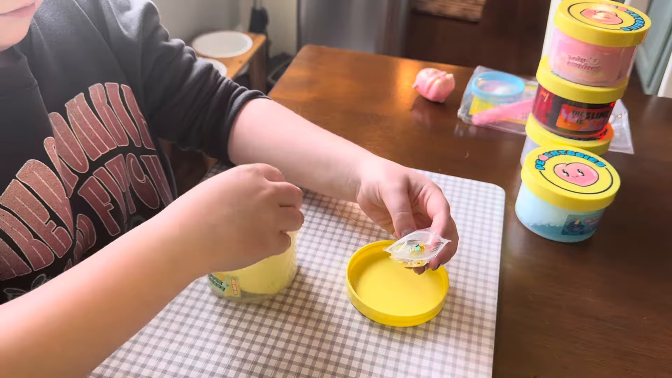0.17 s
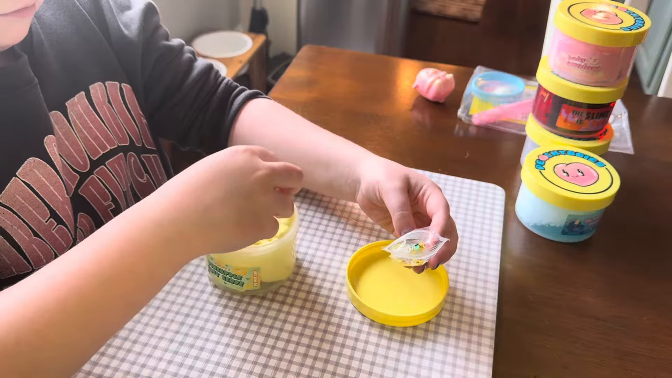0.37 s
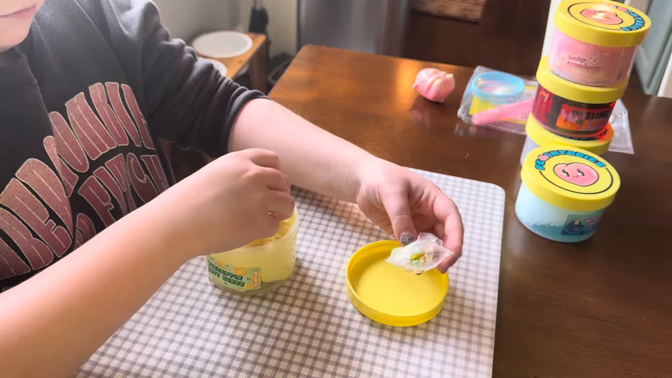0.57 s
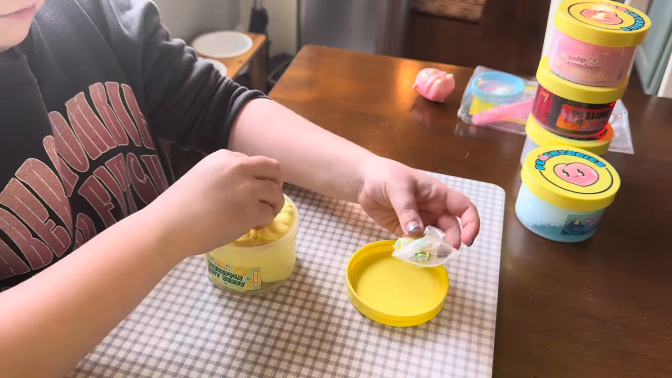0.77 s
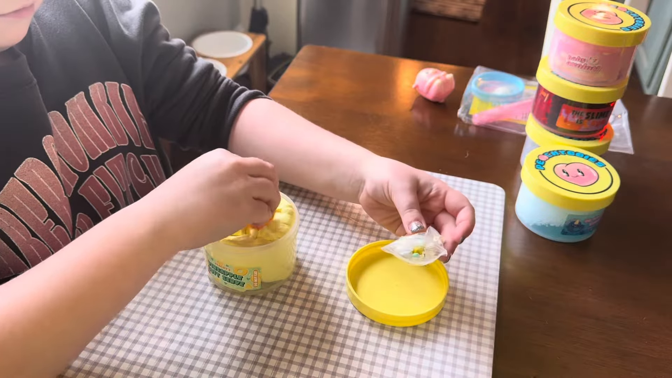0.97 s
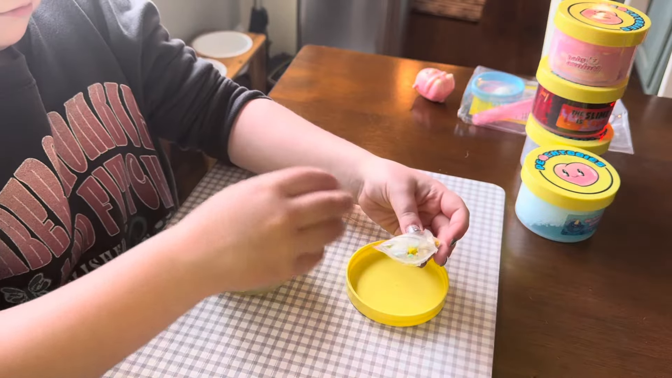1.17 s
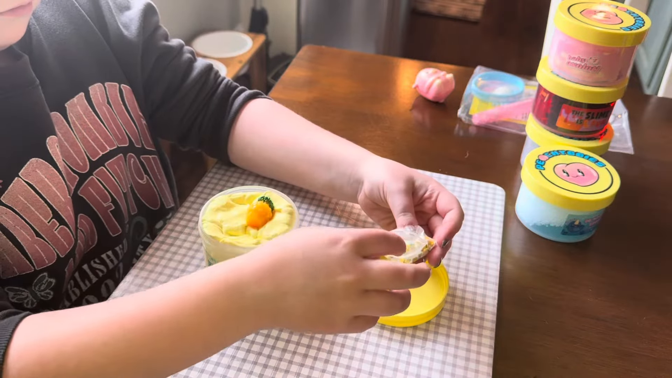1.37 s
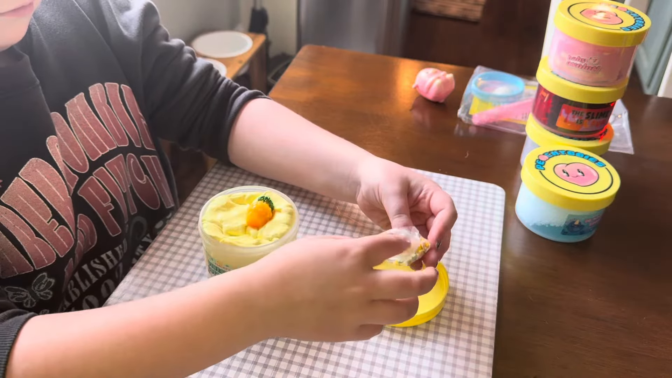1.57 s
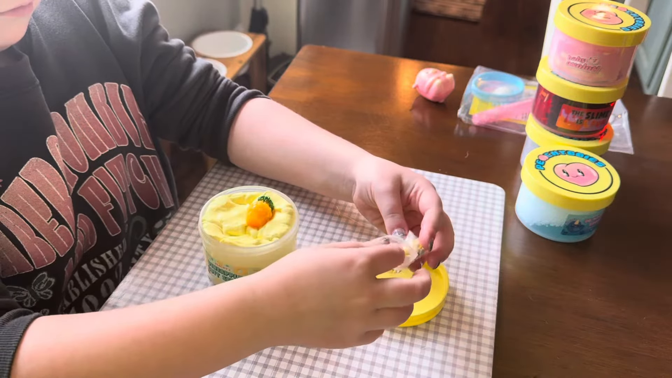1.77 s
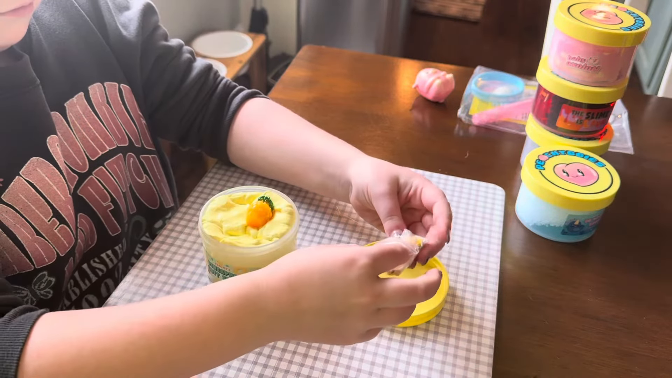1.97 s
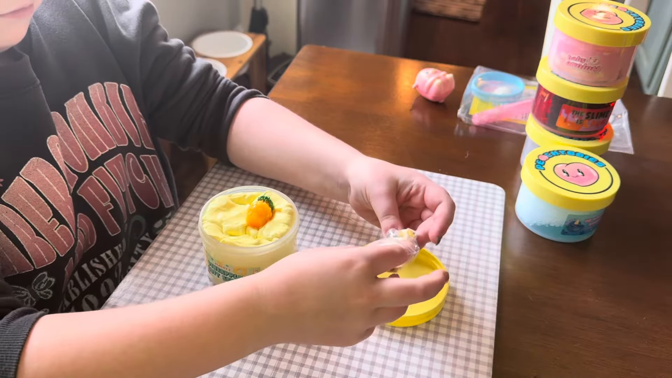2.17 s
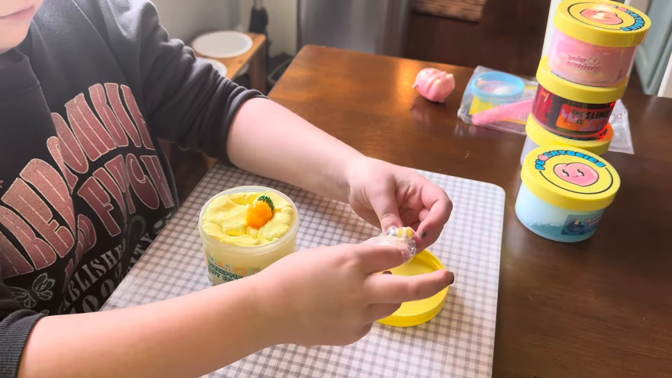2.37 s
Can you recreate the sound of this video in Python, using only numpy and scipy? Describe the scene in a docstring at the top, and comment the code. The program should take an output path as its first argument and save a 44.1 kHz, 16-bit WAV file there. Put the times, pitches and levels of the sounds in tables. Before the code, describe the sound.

Close stereo pickup of thin plastic film being handled: one early snap, a light knock bouncing to rest on wood, soft low bumps, then increasingly busy crisp crackling over faint room hum.

```python
"""Fingers work a small plastic bag on a wooden table: short noisy snaps over a fine crinkle of random ticks.
Early on a light hard thing drops and bounces to rest, each landing a noisy crack plus fading wood tones.
Arms and a tub thump the table softly: slowly swelling low tones with a scuff of noise.
Behind it a quiet room hums, made of shaped random noise. Two microphone ports, left and right, hear it all."""
import sys
import numpy as np
from scipy import signal
from scipy.fft import rfft, irfft
from scipy.io import wavfile
from scipy.ndimage import uniform_filter1d

SR = 44100
rng = np.random.default_rng(int(sys.argv[2]) if len(sys.argv) > 2 else 0)


def dump_mix(stems):
    """Bounce the given channels to the path in sys.argv[1] as a 16-bit WAV at rate SR."""
    frames = np.atleast_2d(stems).T  # one column per channel
    limited = np.clip(frames, -1, 1)  # hard clip at full scale
    pcm = np.round(limited * 32767).astype(np.int16)
    wavfile.write(sys.argv[1], SR, pcm)


N = 110250  # length [samples]

# Room hum, relative to its other pitches: (frequency [Hz], level [dB])
HUM_COLOUR = [(20, -4), (64, -1), (240, -1), (292, -2), (459, -6), (514, -9), (956, -18.5), (2710, -40.5),
              (3500, -36.5), (8000, -41), (11000, -42), (13500, -48), (15000, -53), (17000, -117)]
# How alike left and right are in the hum and the echo: (frequency [Hz], likeness [0 to 1])
LIKENESS = [(30, .99), (100, .96), (200, .88), (350, .7), (600, .3), (1200, .15), (4000, .3), (6500, .3),
            (7500, .93), (17000, .96)]
# Room echo: (frequency [Hz], time to fade by 60 dB [s], relative level [dB])
ROOM_ECHO = [(58.5, 0.57, -20), (149, 0.62, 10), (494, 0.34, 9.5), (1410, 0.63, 10.5), (2340, 0.62, 7),
             (5200, 0.55, 8), (9300, 0.33, 1), (12700, 0.37, 4.5), (15300, .2, -41)]

# Soft thumps: (time [s], peak of low tones [dB], upper tones relative to it [dB],
# scuff relative to it [dB], rise time of low tones [s])
THUMPS = [(0.225, -35, -6, -10, 0.086), (0.307, -30.5, -29, -30, 0.014), (0.427, -43.5, -11, -27, 0.0057),
          (0.458, -45.5, -12, -10, 0.022), (.68, -61, -27, -14, 0.022), (0.598, -58, -10, -38, 0.013),
          (0.8694, -59, 10.5, 13, 0.0019), (0.8864, -30.5, -9.5, -15, 0.01), (.93, -45, 2.5, -3.5, 0.0072),
          (0.976, -35, -7.5, -16, 0.0065), (1.076, -49.5, -10.5, -32, 0.012),
          (1.361, -45.5, -14, -19, 0.0089), (1.39, -46, -10, -21, .015), (1.43, -48.5, -9.5, -30.5, 0.013),
          (1.488, -48, -15, -23, 0.035), (1.545, -46.5, 1, -30, 0.0051), (2.016, -52.5, 7, 12.5, 0.002),
          (2.03, -43, 3.5, -10, 0.008), (2.044, -54.5, 12.5, -14, 0.002), (2.062, -52, 9.5, 3, 0.004),
          (2.087, -45, -11, -7.5, 0.015), (2.492, -52, 7, 11.5, 0.0026)]
# Table top tones, three low then the upper ones: (frequency [Hz], level [dB], time to fade by 60 dB [s])
TABLE_TONES = [(55.2, -5, 0.3), (64.35, 1, 0.22), (87.8, -12.5, 0.11), (161, -7.5, 0.076),
               (194.8, 7, 0.054), (240, -9.5, 0.12), (282.7, 2, 0.075), (498.5, -4, 0.049),
               (592, -14.5, 0.073), (761, -7, 0.042)]
# Colour of the scuff in a thump: (frequency [Hz], level [dB])
SCUFF_COLOUR = [(240, -4), (400, 4), (591, 8), (1100, -3.5), (2640, -0.5), (3220, -4.5), (5000, -9.5),
                (6200, -26.5), (9000, -29), (19800, -90)]

# Landings of the dropped thing, some on two edges: (time [s], crack peak [dB], lowest tone peak [dB],
# other tones peak [dB], crack tilt [dB per octave])
BOUNCES = [(0.2099, -15.5, -24, -20, 3), (0.2534, -18.5, -26, -25, -1.5), (0.2873, -27, -50, -31, 2),
           (0.2899, -21, -36, -26, 0), (0.3146, -37, -59, -41.5, 2), (0.3182, -20, -46, -33, -3),
           (0.341, -21, -42, -29.5, -1), (.3586, -27, -45, -45, -0.7)]
# Tones of the dropped thing and the wood, lowest first: (frequency [Hz], level [dB], time to fade by 60 dB [s])
KNOCK_TONES = [(132, -6, 0.15), (204.2, -2.5, 0.09), (230.8, -6.5, 0.079), (263.6, 0.5, 0.055),
               (345.6, -6.5, 0.084), (403.3, -7, 0.082), (613, -11.5, 0.045), (694, -9, 0.059),
               (972, -15, 0.16), (1270, -25.5, 0.27), (1506, -12, 0.035), (2113, -15, 0.053),
               (2596, -36, 0.0156)]
# Colour of the contact crack, before its tilt: (frequency [Hz], level [dB])
CRACK_COLOUR = [(150, -29), (350, -4.5), (600, 7.5), (1060, 2.5), (1780, -0.5), (2840, -3), (4300, -15.5),
                (5900, -15), (7700, -13), (12000, -26), (16500, -37)]

# Film snaps: (time [s], treble level before SNAP_DB [dB], body relative to it before BODY_DB [dB],
# body pitch [Hz], treble tilt before limiting [dB per octave])
SNAPS = [(0.454, -46.5, -19, 1350, -13), (0.6607, -63, -5, 990, 4), (0.7804, -59, -7, 1555, -5),
         (1.1025, -31.5, -15.5, 3550, -6.5), (1.4223, -55, -33, 1240, 1), (1.4463, -71, -7, 2070, 8),
         (1.5868, -35, -16, 2060, 11), (1.598, -43.5, -5.5, 1380, 0), (1.6145, -46, 3, 4100, 0),
         (1.6336, -37, -11, 3900, 0), (1.6354, -31.5, -12, 1100, -1), (1.7119, -54, 9.5, 3450, -14),
         (1.7423, -33, -10, 3400, 8), (1.7437, -52.5, 4.5, 1280, -4), (1.855, -51, -12, 990, -6),
         (1.869, -48, -31, 2620, -13), (1.8908, -45, -4, 2350, -10), (1.919, -48, -3, 1210, -12),
         (1.9234, -41, -2, 2860, -10), (1.9284, -59, 1, 2600, -10), (1.943, -33.5, -30, 3870, 5),
         (1.962, -27, -25, 830, 2), (1.9842, -28.5, -20, 830, 8), (2.0317, -27, -12.5, 1900, 9),
         (2.1229, -34, -9.5, 2920, 8.5), (2.165, -45, -17, 1570, 17), (2.1711, -53, 4, 2410, 16),
         (2.1951, -31, -40, 840, 9), (2.3345, -50.5, 3, 2330, -5.5), (2.3734, -45.5, 3, 2670, 8),
         (2.3786, -48, 10.5, 2600, -1), (2.3871, -57, 15, 2780, 10), (2.4, -59.5, 12.5, 1010, -8),
         (2.4362, -28, -14, 2840, 10), (2.476, -53, -3, 1740, 2), (1.937, -54, 8, 2800, 1),
         (1.994, -40.5, 3, 4240, -11), (2.39, -52, -1, 1900, -1), (2.413, -46, -12, 1480, 4),
         (0.158, -39.5, -26, 3520, 11), (1.5578, -41, 1, 4130, -6), (1.5614, -19.5, -15, 4100, 11),
         (1.5631, -36, -4.5, 1300, -11), (1.569, -26, -5.5, 3900, 0), (1.577, -54, -1, 4600, 2),
         (1.1067, -51.5, -1, 4520, 7), (1.9716, -41, -1, 3100, -8), (2.0446, -38, -22, 2580, 20)]
# Treble colour of a snap, before its tilt: (frequency [Hz], level [dB])
SNAP_TREBLE = [(1500, -106), (3000, -13), (5000, -1.5), (7800, 7.5), (10000, 2), (12000, 3), (14500, 2),
               (16500, -11)]
# Body colour of a snap: (multiple of its pitch [ratio], level [dB])
SNAP_BODY = [(.2, -40), (.5, -7), (1, 0), (1.6, -6), (3, -22), (6, -50)]
# Fine crinkle, average levels over time: (time [s], treble level [dB], body level [dB])
CRINKLE_LEVELS = [(0, -106, -129), (0.119, -85, -74.5), (0.149, -60, -65), (0.164, -55, -54.5),
                  (0.176, -64, -77.5), (0.218, -80, -52), (.4, -104, -65.5), (0.531, -67.5, -70),
                  (.67, -87, -72), (.9, -91, -77), (1.03, -87, -99), (1.18, -98, -79), (1.41, -80, -75),
                  (1.52, -70.5, -67.5), (1.59, -65, -56.5), (1.71, -67, -64), (1.82, -74, -68),
                  (1.872, -56.5, -61), (1.91, -64.5, -61.5), (1.982, -53.5, -54), (2.04, -79, -59),
                  (2.09, -68, -78), (2.18, -68, -70), (2.32, -75, -71.5), (2.39, -62, -70), (2.5, -84, -60)]
# Treble colour of the crinkle: (frequency [Hz], level [dB])
CRINKLE_TREBLE = [(3000, -14.5), (5000, -10), (7800, -0.5), (12000, -5), (14000, -1), (15000, -25),
                  (16500, -44)]
# Body colour of the crinkle: (frequency [Hz], level [dB])
CRINKLE_BODY = [(400, -15), (1200, -2), (2300, -4), (4000, 0), (7000, -12), (10000, -41), (16500, -53)]

# Phase difference of the ports: (frequency [Hz], lead of the left [radians])
PORT_PHASE = [(0, 0), (1000, .1), (2000, -.8), (4000, -2.4), (5500, -2), (7000, 0), (8000, .7), (9000, 2.2),
              (11000, 4.9), (13000, 7.1), (15000, 9.5), (17000, 11.9)]
# Level difference of the ports: (frequency [Hz], left over right [dB])
PORT_BALANCE = [(30, -.3), (125, -2), (500, .5), (2000, -1.5), (5000, -1), (7500, 0)]

HUM_DB, PATCH_DB = -59, 1.5  # average hum level, typical size of its drifting patches
TONE_HZ, TONE_WIDTH_HZ, TONE_DB = 516, 4.4, 9.5  # a faint narrow line in the hum
SCUFF_S, CRACK_S, SNAP_S, BODY_S = 0.02, 0.0015, 0.0008, 0.0013  # fading times of the noise puffs
RING_RISE_S = 0.0031  # rise time of the bounce tones
CRACK_EDGE, SNAP_EDGE = 4.26, 4  # strength of the single click beside the noise
CRACK_UNLIKE = 0.6  # strength of the crack noise that has opposite signs at the two ports
KNOCK_LEAD = 3  # head start of the bounces on the left, before their echo is added [samples]
SNAP_DB, BODY_DB = 5, 5  # boosts: for the whole snap, then for its body only
CRINKLE_PER_S, CRINKLE_SPREAD_DB = 3500, 2.7  # ticks per second on each side, scale of their random boost
THUMP_ROOM_DB, KNOCK_ROOM_DB, BAG_ROOM_DB = -1.5, -1, 3.5  # gains of the room echo
LOW_CUT_HZ, EDGE_HZ = 38, 16600  # lower and upper limits of the final sound


def amp(db):
    """Turns decibels into a gain."""
    return 10 ** (np.asarray(db) / 20)


def evened(x):
    """Scales a signal to an average (rms) level of 1."""
    return x / np.sqrt(np.mean(x ** 2) + 1e-20)


def read(points, hz, order=1):
    """Reads one column of a table at any frequency, along a log frequency axis."""
    columns = np.transpose(points)
    return np.interp(np.log(hz + 1), np.log(columns[0] + 1), columns[order])


def add(mix, s, sound):
    """Mixes a sound in at time s, cutting it off where the mix ends."""
    part = mix[..., round(s * SR):][..., :sound.shape[-1]]
    part += sound[..., :part.shape[-1]]


def colour(points, size=2048):
    """Makes a filter with the given colour that starts at once (minimum phase), with energy 1."""
    log_gain = np.log(amp(read(points, abs(np.fft.fftfreq(size, 1 / SR)))))
    taps = np.fft.ifft(np.exp(np.conj(signal.hilbert(log_gain)))).real[:size // 2]
    return taps / np.linalg.norm(taps)


def tilted_colour(points, tilt_db, pivot_hz):
    """Tilts a colour by some dB per octave around a pivot, then makes its filter."""
    return colour([(hz, db + tilt_db * np.log2(hz / pivot_hz)) for hz, db in points])


def burst(noise, decay_s, taps, edge=0):
    """A click plus a puff of noise that rises fast and dies away, both coloured; peak 1."""
    u = np.arange(len(noise)) / SR / decay_s
    puff = noise * np.minimum(4 * u, 1) * np.exp(-u)
    click = edge * signal.unit_impulse(len(u), 6)
    x = signal.fftconvolve(puff + click, taps)
    return x / abs(x).max()


def ring(tones, rise_s):
    """Fading tones that swell in after a push; peak 1."""
    t = np.arange(SR // 2) / SR
    x = sum(amp(db - 60 * t / t60) * np.sin(2 * np.pi * hz * t) for hz, db, t60 in tones)
    x = x * (1 - np.exp(-(t / rise_s) ** 2))
    return x / abs(x).max()


def pair(a, b, hz):
    """Blends two short-time spectra into a left-right pair, as alike as LIKENESS says."""
    same = np.clip(read(LIKENESS, hz), -1, 1)[:, None]
    return np.array([a, same * a + np.sqrt(1 - same ** 2) * b])


def room(x):
    """Room echo: sparse reflections of random sign, each pitch range dying at its own speed."""
    taps = np.zeros((2, SR))
    slots = np.arange(300, SR - 20, 20)
    at = slots + rng.integers(0, 20, (2, len(slots)))
    np.put_along_axis(taps, at, rng.choice([-1., 1.], at.shape), 1)
    hz, t, z = signal.stft(taps, SR, nperseg=512)
    fade_s = read(ROOM_ECHO, hz)[:, None]
    level_db = read(ROOM_ECHO, hz, order=2)[:, None] - 60 * t / fade_s
    tail = signal.istft(pair(*z, hz) * amp(level_db), SR, nperseg=512)[1]
    return signal.fftconvolve(x[None], tail / 25, axes=1)[:, :N]


def hum():
    """Room hum: random short-time spectra with gentle drifting patches and one narrow line."""
    frames, hz = N // 512 + 5, np.fft.rfftfreq(2048, 1 / SR)
    a, b, c, d, patches = rng.standard_normal((frames, 1025, 5)).T
    # smooth the patches over frequency, then over time
    patches = evened(uniform_filter1d(uniform_filter1d(patches, 12, 0), 6, 1))
    z = pair(a + 1j * b, c + 1j * d, hz)
    z = z * amp(read(HUM_COLOUR, hz)[:, None] + PATCH_DB * patches)
    z *= amp(TONE_DB / (1 + ((hz - TONE_HZ) / TONE_WIDTH_HZ) ** 2))[:, None]
    sound = signal.istft(z, nperseg=2048, noverlap=1536)[1][:, :N]
    return amp(HUM_DB) * evened(sound)


def thumps():
    """Soft pushes make the table top ring; its upper tones rise twice as fast, and noise adds a scuff."""
    out, scuff = np.zeros(N), colour(SCUFF_COLOUR)
    noises = rng.standard_normal((len(THUMPS), 3000))
    for (s, db, upper_db, scuff_db, rise_s), noise in zip(THUMPS, noises):
        add(out, s, amp(db) * ring(TABLE_TONES[:3], rise_s))
        add(out, s, amp(db + upper_db) * ring(TABLE_TONES[3:], 0.5 * rise_s))
        add(out, s, amp(db + scuff_db) * burst(noise, SCUFF_S, scuff))
    return out + amp(THUMP_ROOM_DB) * room(out)


def bounces():
    """Each landing is a contact crack and a woody ring that first pulls away (starts negative)."""
    out = np.zeros((2, N))
    boom, wood = ring(KNOCK_TONES[:1], RING_RISE_S), ring(KNOCK_TONES[1:], RING_RISE_S)
    noises = rng.standard_normal((len(BOUNCES), 2, 600))
    for (s, db, boom_db, ring_db, tilt_db), (shared, unlike) in zip(BOUNCES, noises):
        taps = tilted_colour(CRACK_COLOUR, tilt_db, 1000)
        crack = np.array([burst(shared + side * CRACK_UNLIKE * unlike, CRACK_S, taps, CRACK_EDGE)
                          for side in (1, -1)])
        add(out, s, amp(db) * crack)
        add(out, s, -amp(boom_db) * boom - amp(ring_db) * wood)
    direct = np.array([out[0], np.roll(out[1], KNOCK_LEAD)])
    return direct + amp(KNOCK_ROOM_DB) * room(out.mean(0))


def snaps():
    """Single snaps of the film: a sharp treble burst and a hollow body burst, with a room echo."""
    out, echo_source = np.zeros((2, N)), np.zeros(N)
    noises = rng.standard_normal((len(SNAPS), 2, 400))
    for (s, db, body_db, hz, tilt_db), (treble_noise, body_noise) in zip(SNAPS, noises):
        treble_db = db + SNAP_DB
        low_db = db + body_db + BODY_DB
        treble = tilted_colour(SNAP_TREBLE, np.clip(tilt_db, -8, 8), 9000)
        hollow = colour([(k * hz, g) for k, g in SNAP_BODY])
        add(out, s, amp(treble_db) * burst(treble_noise, SNAP_S, treble, SNAP_EDGE))
        # the body is 3 dB stronger on the right
        body = burst(body_noise, BODY_S, hollow, SNAP_EDGE)
        add(out, s, amp(low_db + np.array([[-1.5], [1.5]])) * body)
        # the echo is fed by plain coloured clicks
        add(echo_source, s, amp(treble_db) * treble + amp(low_db + 5.5) * hollow)
    return out + amp(BAG_ROOM_DB) * room(echo_source)


def crinkle():
    """A dense random rain of tiny ticks, coloured as treble (same on both sides) and as softer body."""
    boost_db = CRINKLE_SPREAD_DB * np.minimum(rng.exponential(1, (2, N)), 5)
    size = amp(boost_db) * rng.standard_normal((2, N))
    ticks = size * (rng.random((2, N)) < CRINKLE_PER_S / SR)
    t, (s, treble_db, body_db) = np.arange(N) / SR, np.transpose(CRINKLE_LEVELS)
    both = ticks.sum(0)[None]
    leaky = ticks + 0.11 * ticks[::-1]  # a little of each side leaks into the other
    out = np.zeros((2, N))
    for drive, points, db in (both, CRINKLE_TREBLE, treble_db), (leaky, CRINKLE_BODY, body_db):
        sound = signal.oaconvolve(drive, colour(points)[None], axes=1)[:, :N]
        out = out + amp(np.interp(t, s, db)) * evened(sound)
    return out


def bag():
    """The worked plastic bag: snaps of its film over the fine crinkle."""
    return snaps() + crinkle()


def scene():
    """Adds up all the sounds, from the background to the bag."""
    return hum() + thumps() + bounces() + bag()


def record(dry):
    """Shifts the left port's phase and level, cuts the deep bass, then the highest treble."""
    hz = np.fft.rfftfreq(2 * N, 1 / SR)
    phase = np.interp(hz, *np.transpose(PORT_PHASE))
    turn = amp(read(PORT_BALANCE, hz)) * np.exp(1j * phase)
    left = irfft(rfft(dry[0], 2 * N) * turn)[:N]
    ported = np.array([left, dry[1]])
    low_cut = signal.butter(3, LOW_CUT_HZ, "high", fs=SR, output="sos")
    cut = signal.sosfilt(low_cut, ported)
    band_limit = signal.firwin(511, EDGE_HZ, window=("kaiser", 9), fs=SR)
    return signal.oaconvolve(cut, band_limit[None], "same")


dry = scene()
out = record(dry)
dump_mix(out)
```